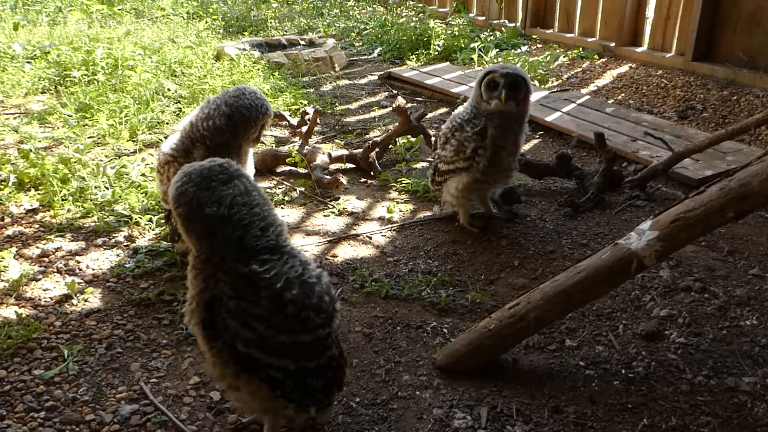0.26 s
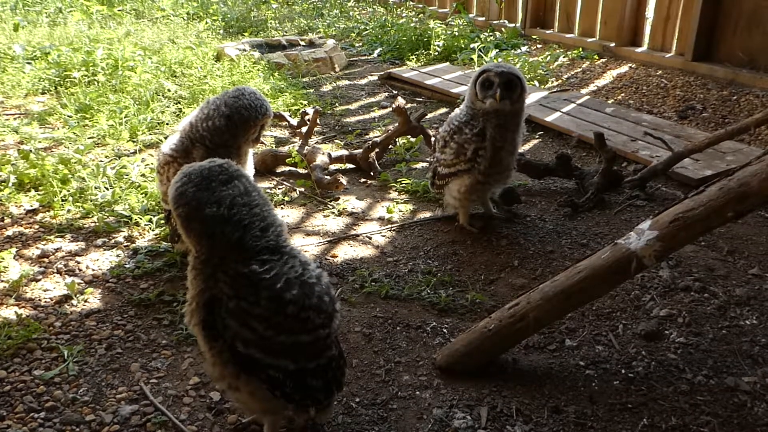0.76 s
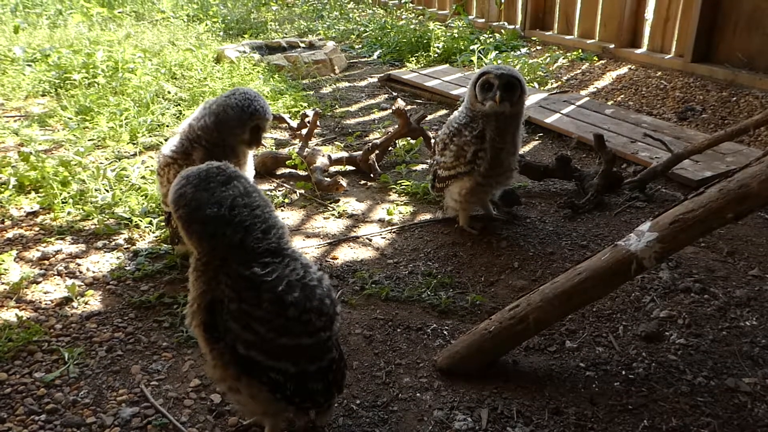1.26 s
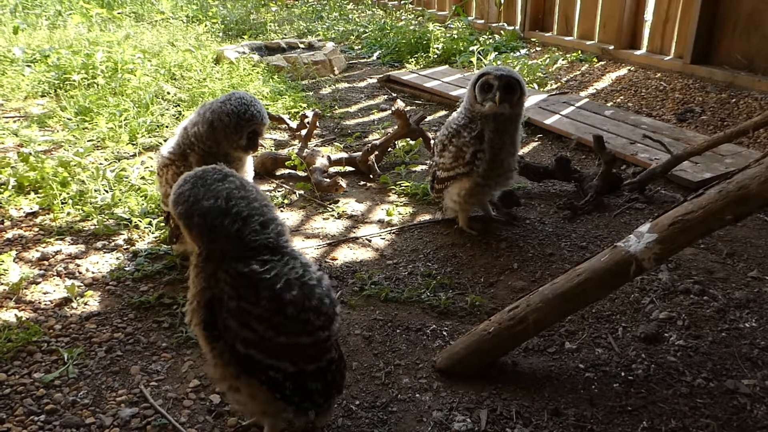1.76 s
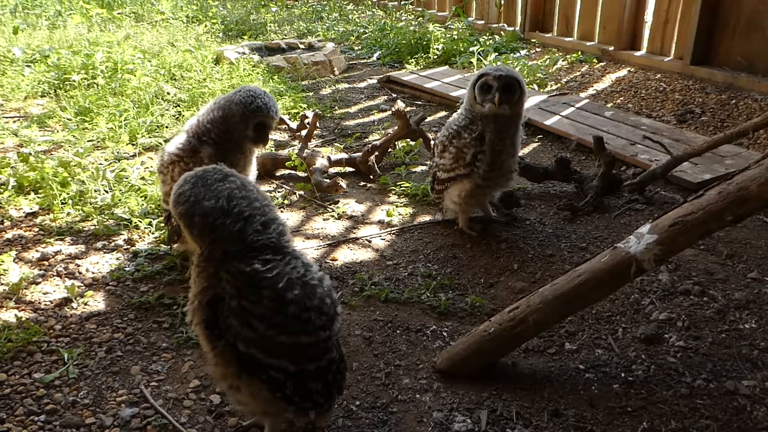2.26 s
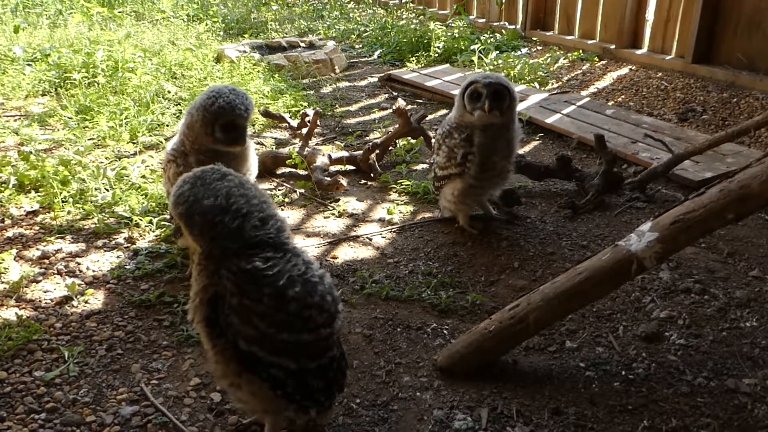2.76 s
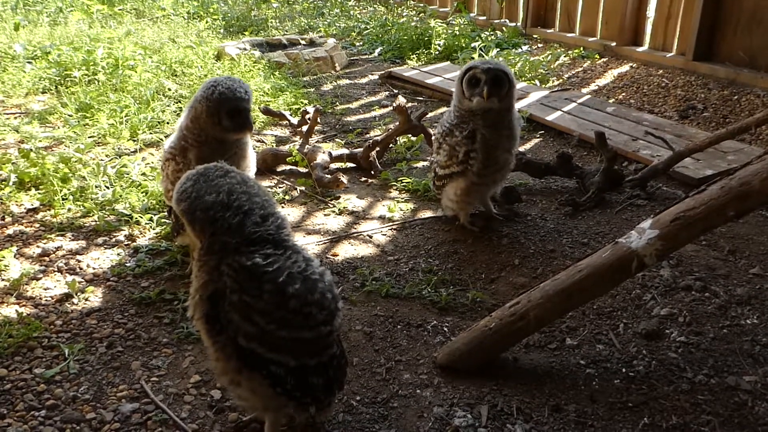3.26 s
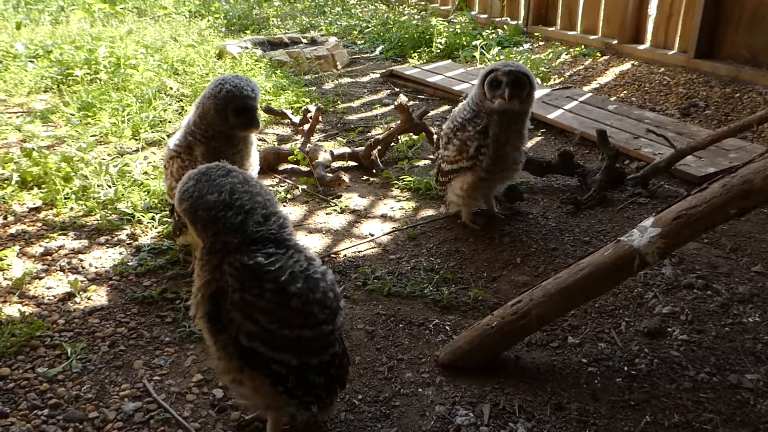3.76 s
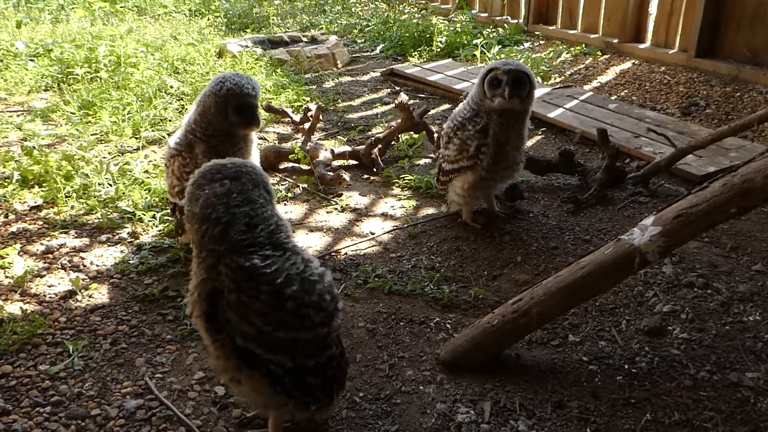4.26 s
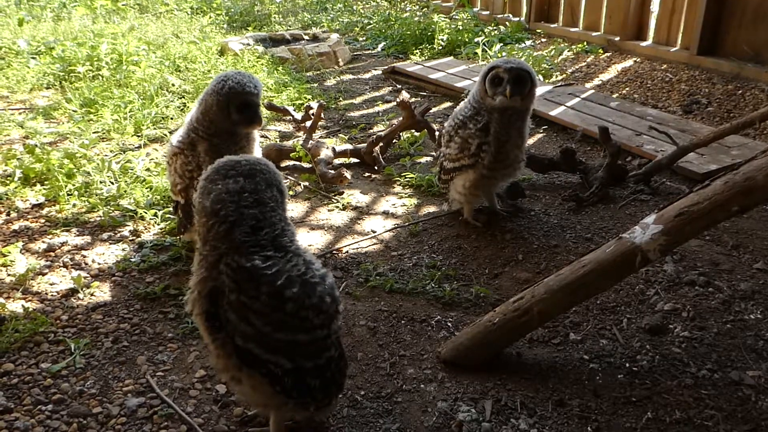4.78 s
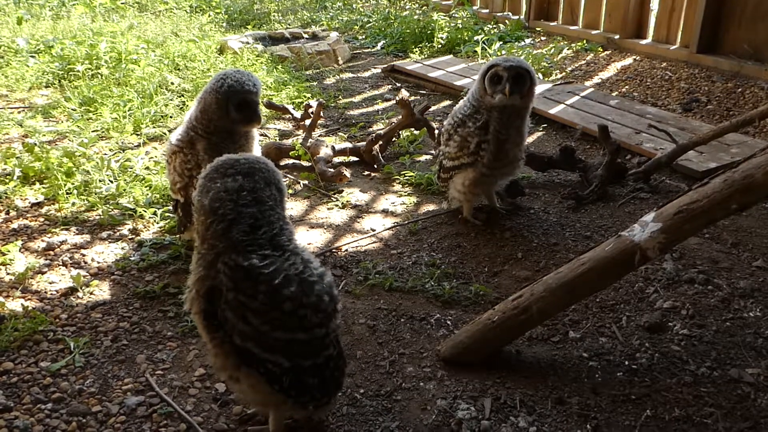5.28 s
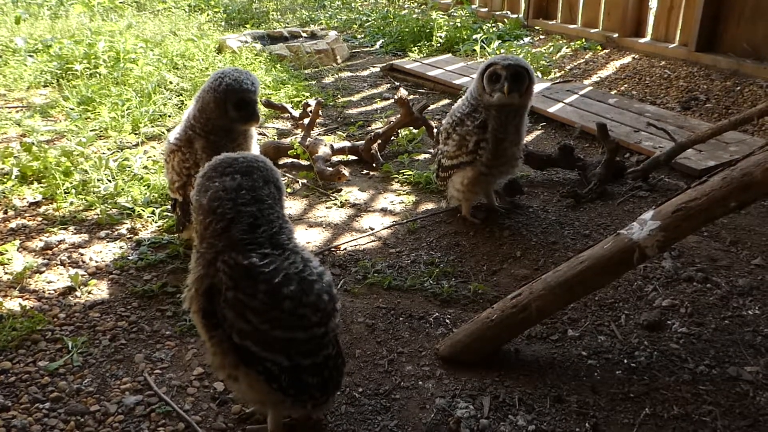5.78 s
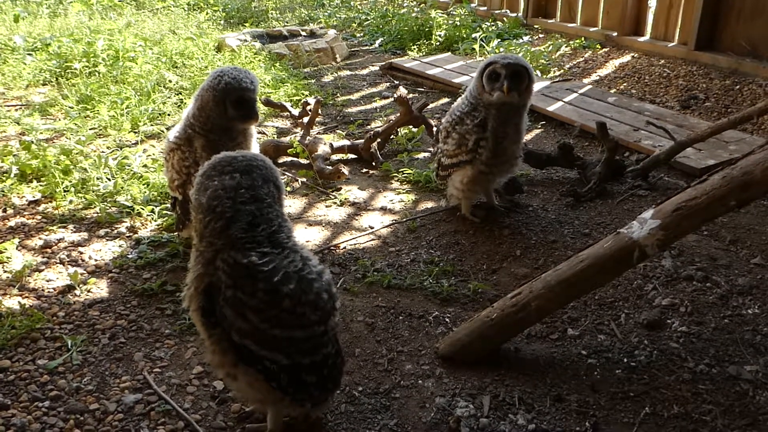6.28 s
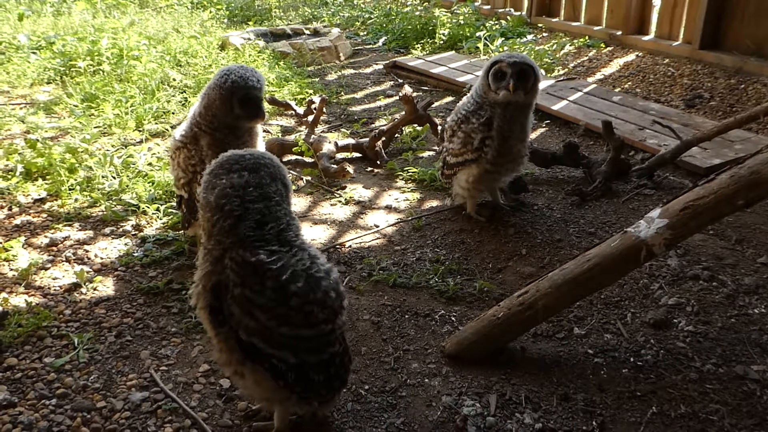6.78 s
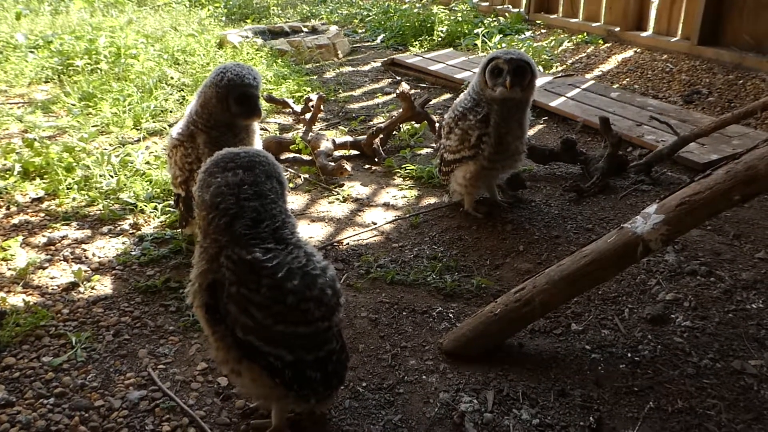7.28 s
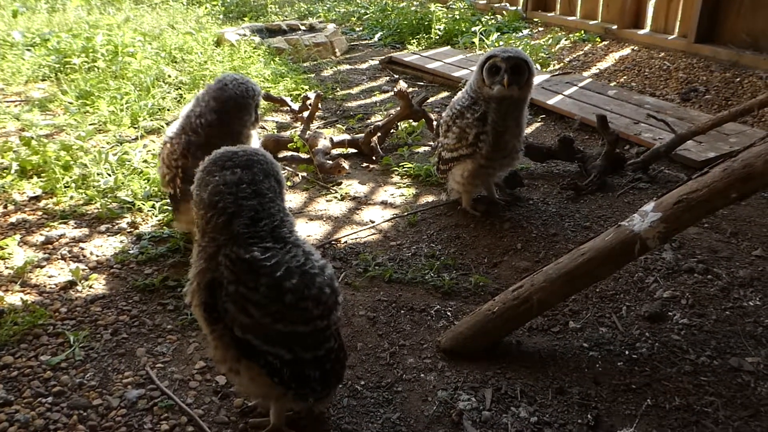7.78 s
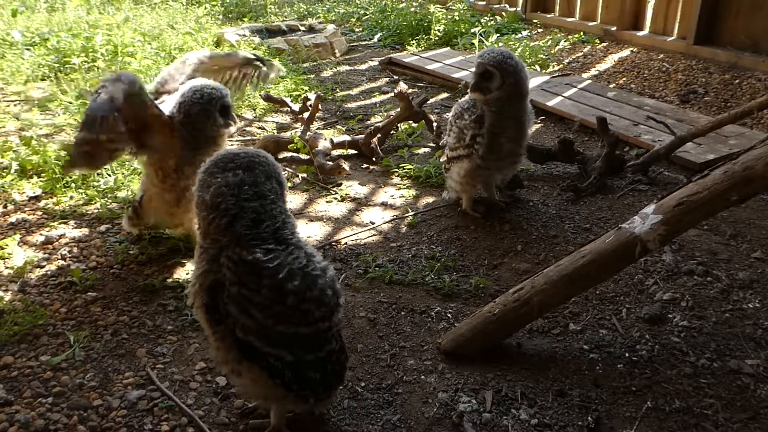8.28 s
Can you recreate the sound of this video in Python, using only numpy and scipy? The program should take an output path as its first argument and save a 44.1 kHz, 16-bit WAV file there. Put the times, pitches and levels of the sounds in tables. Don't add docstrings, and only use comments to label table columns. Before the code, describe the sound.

In an outdoor wooden enclosure, owlets beg with harsh, airy screeches of roughly half a second to a second. An overlapping pair opens, rapid clicks and light snaps fill the pause, then two separate calls follow. The last meets soft feather flapping, a puff of air and a very loud short woody knock. Faint cricket, distant chirps and a soft hum lie beneath, heard from nearby with short plank echoes.

```python
import sys
import numpy as np
from scipy import signal
from scipy.fft import rfft, irfft, next_fast_len
from scipy.io import wavfile

SR = 44100
rng = np.random.default_rng(int(sys.argv[2]) if len(sys.argv) > 2 else 0)


def log_audio(samples):
    frames = np.atleast_2d(samples).T
    limited = np.clip(frames, -1, 1)
    pcm = np.round(limited * 32767).astype(np.int16)
    wavfile.write(sys.argv[1], SR, pcm)


def invert_db(x):
    u = np.asarray(x, float) / 20
    return 10 ** u


N = 376613

# time in seconds, pitch in Hz, level in dB.
WHISTLES = [
    [(0.372, 5300, -51), (0.386, 6000, -34), (0.41, 7800, -49.5), (0.6, 7400, -46), (0.88, 7220, -39),
     (0.925, 6970, -35), (0.965, 6110, -51), (0.995, 5140, -40), (1.04, 4850, -71)],
    [(4.819, 4890, -56), (4.829, 5360, -42), (4.858, 7800, -47.5), (4.93, 6780, -44), (5.191, 6620, -45),
     (5.231, 6730, -40.5), (5.365, 6200, -53.5), (5.392, 5420, -34.5), (5.414, 4790, -39)],
    [(7.539, 5300, -69), (7.547, 5560, -37.5), (7.572, 7740, -36.5), (7.612, 7650, -59), (7.63, 7210, -41),
     (7.804, 7220, -38), (7.87, 6920, -38), (8.06, 5846, -40), (8.125, 5700, -41)],
]
# dB under the tone at 6 kHz, dB lost per kHz of pitch.
OCTAVES = [(-22, 9), (-21, 4.5), (-15, 10.5)]
# width in Hz, steady share.
WHISTLE_BLURS = [(100, 1.0), (170, .45), (95, .8)]
CALL_PAN_DB = [-2, -3.5, 0.3]

# start in seconds, length in seconds, windpipe in Hz at start and at end, pan in dB.
BREATHS = [
    (0.0, 0.78, 958.3, 898, -2.5),
    (.38, 0.69, 853, 830, -3.5),
    (4.815, 0.636, 626, 630, -4),
    (7.542, 0.58, 1022, 1004, 1.7),
]
# windpipe, chest, throat and bill in dB.
VOICES = [(-43, -45.5, -39.5, -49.5), (-56.5, -50, -44.5, -53), (-62, -52, -49, -63),
          (-52, -44.5, -44, -56)]
# windpipe, chest, throat and bill in dB.
SWELLS = [(-8, -1, -2.5, -4.5), (-2.5, 2, -9.5, -6.5), (1.5, 3.5, -7.5, 6), (0.5, 0, 2.5, 2)]
# throat delay in seconds, first spit at the bill in dB,
# windpipe ring width in Hz, attack in seconds.
OPENINGS = [(0.09, 8, 43, .033), (0.058, 6, 27, 0.031), (0.017, 13, 48, 0.038), (0.018, 8.5, 52, 0.033)]
# time in seconds, Hz, share.
GAPES = [
    [(0.0, 3500, .05), (.1, 3700, 0.063), (.74, 3700, 0.11), (.79, 3900, 0.6)],
    [(.38, 5260, .06), (1.08, 5000, .06)],
    [(4.81, 5000, 0.067), (4.9, 5250, 0.24), (5.1, 5190, 0.24), (5.25, 5300, 0.036), (5.48, 5000, 0.036)],
    [(7.535, 4650, .1), (7.7, 4030, 0.12), (7.85, 4096, 0.22), (7.98, 4540, 0.47), (8.03, 4270, 0.32),
     (8.07, 4050, 0.49), (8.17, 4000, 0.92)],
]
# time in seconds, throat, windpipe and bill in dB.
EFFORTS = [
    [(0, -1.5, -2, 0.5), (.23, 0.5, 0, 0), (.3, 2, -2, -1.5), (.42, 1, 0, 1), (.48, 0.5, -3, -1),
     (.6, 1, -1, -1), (.77, 0.5, 1.5, 1), (.8, -6, -3, -1), (.83, -12, -3, -5)],
    [(.38, -0.5, 3, -1), (.8, -1, -2.5, 2), (.87, -2, 8, 0), (.97, -3, 1, 3), (1.0, -1, -4, 1),
     (1.04, -8, -11, -12)],
    [(4.81, 3, 1, -6), (4.88, -3.5, -1.5, 0), (4.95, 3.5, -2, 2), (5.09, 2, 4, -1), (5.13, -0.5, -2, 2),
     (5.25, -3.5, 2.5, -2), (5.36, -3, 2, 2), (5.4, -3, -2, -4), (5.45, 0, -5, -6)],
    [(7.54, -11, -14, 7), (7.6, 0.5, 0, -6), (7.63, 0.5, -1, -5), (7.69, 3, 5, 0.5), (7.75, 1, 2, -1),
     (7.85, -0.5, -4.5, 5), (7.96, 2, -1.5, 0), (8.1, -1, 1.5, -0.5), (8.15, -3, -11, -2)],
]
# time in seconds, length in seconds, gain in dB.
SURGES = [(0.019, 0.014, 4), (0.075, 0.026, 7), (0.149, 0.013, 8.5), (0.228, 0.022, 7), (0.323, 0.018, 3),
          (0.4, 0.042, 9), (0.638, 0.015, 12), (0.715, 0.028, 4.5), (5.077, 0.027, 0), (5.123, .012, 6),
          (5.207, .015, 2), (7.633, 0.022, 10.5), (8.122, 0.016, 0)]
# Hz, width in Hz, level in dB.
CHESTS = [
    [(840, 320, -5.5), (1390, 730, -14), (1904, 400, 1.5), (2530, 720, -7), (2920, 340, -7)],
    [(780, 590, 10), (1250, 1000, -0.5), (2130, 370, 12), (2500, 290, -12), (2600, 750, -3)],
    [(790, 480, 14), (1250, 1300, -0.5), (2020, 540, 16), (2350, 130, 11), (2720, 400, -11)],
    [(740, 770, -6), (1560, 780, -13.5), (2090, 340, 2), (2650, 490, -16), (2950, 250, -3.5)],
]
THROATS = [
    [(3700, 480, 6), (4426, 210, 5), (4850, 680, 5), (5780, 610, -6), (6600, 170, 2)],
    [(3830, 1200, -8.5), (4500, 600, -6), (5300, 290, -0.5), (6220, 440, 3.5)],
    [(3610, 310, -1.5), (4340, 380, -2), (5250, 480, 4.5), (6030, 360, 0)],
    [(3600, 720, 1), (4360, 320, 1.5), (5000, 1000, 0), (6330, 530, -8)],
]
BILLS = [
    [(7400, 2800, 8.5), (8620, 1600, 9.5), (9880, 550, 11), (13000, 1500, 2), (14300, 2200, -9)],
    [(7250, 1300, 13), (8700, 1050, 10), (9800, 2400, 9.5), (12300, 1100, -1), (13900, 900, -4)],
    [(7000, 890, 11), (8550, 1050, 4), (9500, 1200, 8), (12300, 970, -1), (13300, 650, -10)],
    [(7450, 990, 4.5), (9100, 1500, 3), (10900, 1200, -3), (11500, 1100, -23), (14200, 900, -28)],
]

# time in seconds, peak in dB, pan in dB.
SNAPS = [(1.276, -56, -1), (2.720, -58, -1.1), (2.7642, -17, -2), (3.521, -35, -.8), (4.285, -52, -3),
         (4.300, -32, -5), (4.304, -33, -3.5), (6.872, -52, -5), (6.8875, -60, -1), (8.346, -27, 5),
         (8.3597, -0.5, -1.2), (3.31, -55, -6), (5.14, -54.5, -10), (2.7765, -18.5, -1.5),
         (2.7800, -18, -2)]
# Hz, level in dB, t60 in ms, echo in dB.
BODIES = [
    [(2310, 7.5, 1.5, 20), (1120, -5, 6.9, 13), (6000, 1.5, 1.4, 12)],
    [(3000, -2, 3, -3)],
    [(844, -3, 24, -9), (613, -18.5, 24, 4.5), (1140, -16, 18, -0.5), (1720, -13.5, 7.7, -2.5),
     (2190, -7, 2.4, -6), (7800, -2, 0.29, -7.5)],
    [(5640, 4.5, 3.3, 3), (2600, 10.5, 1.5, -1.5), (9500, -1, 2.4, -7.5)],
    [(1570, 0, 13, 15), (2970, -1.5, 29, 0.5)],
    [(1500, 3.5, 7.5, -14), (2950, -5.5, 3.4, -6)],
    [(563, 2.5, 8.3, 3), (430, -17.5, 57, 7), (197, -15.5, 24, 4.5)],
    [(1670, 1.5, 12, -10)],
    [(452, 8, 55, 9.5), (275, 11.5, 93, 1.5)],
    [(1400, -5, 3.1, 12)],
    [(1380, 6, 3.57, -5.5), (980, -19.5, 3.5, 13.5), (2160, 4.5, 2.16, -2), (3400, -17, 1.36, 1.5),
     (4550, -27, 0.88, -1), (8050, -11, 0.92, -20)],
    [(268, 2, 84, -7)],
    [(245, -1.5, 74, 4)],
    [(780, 0, 8.4, -24)],
    [(820, 2.5, 11, -17.5), (1800, -16, 10, -13)],
]
# delay in ms, level in dB.
ECHOES = [(2.8, -6.5), (4.1, -5.5), (9.6, -2), (11.0, -10), (15.0, -38), (17.0, -7)]
# low edge in Hz, high edge in Hz, t60 in seconds, level in dB.
PEN = [(155, 480, 0.37, 0.5), (660, 1220, 0.28, 7.5), (1310, 2240, 0.25, 10.5), (2286, 3460, 0.2, 10.5),
       (5260, 17000, 0.15, 10.5), (9040, 9500, 0.077, 19.5), (3650, 5130, 0.2, 10.5)]

# start in seconds, length in seconds, rustle in dB, push of air in dB.
WINGS = [
    (.45, 0.76, -90, -71.5),
    (2.55, .3, -90, -80),
    (3.4, .3, -90, -80),
    (4.9, 0.4, -90, -76),
    (7.6, 0.68, -90, -77),
    (8.047, 0.46, -58.5, -75),
    (8.332, 0.27, -53.5, -65),
    (8.345, 0.05, -90, -55),
]
# Hz, width in Hz, level in dB.
FEATHERS = [(696, 590, 5), (1630, 1400, 0), (3200, 3700, -3.5)]
# start in seconds, length in seconds, level in dB, pan in dB.
SCUFFS = [
    (1.269, 0.15, -57.5, -4),
    (9.7, 0.034, -55, 0),
    (2.759, 0.013, -40.5, -1),
]
# Hz, width in Hz, level in dB.
GRAVEL = [(900, 640, 5), (2300, 1200, 1), (4200, 2200, -4), (7500, 3300, -15)]

# start in seconds, length in seconds,
# start in Hz, end in Hz, level in dB.
CHIRPS = [(1.3, 0.05, 3500, 3560, -62), (1.35, 0.055, 3560, 3520, -63), (1.435, 0.045, 2990, 2950, -62),
          (1.47, 0.09, 2980, 2970, -62), (5.164, .016, 2900, 3020, -46), (5.418, .03, 4050, 3700, -55),
          (5.42, .028, 5450, 5100, -51), (1.0, .03, 3950, 3650, -59), (5.33, .09, 980, 880, -57),
          (8.072, .05, 11900, 10500, -46), (8.075, .06, 11500, 10600, -50), (8.1, .045, 11000, 10400, -52),
          (5.395, .035, 10400, 9000, -54), (5.425, .02, 8200, 7300, -58), (5.345, .045, 12700, 11700, -61),
          (5.19, .07, 3500, 3450, -62)]
# start in seconds, length in seconds, start in Hz, end in Hz, level in dB.
CRICKET_PHRASES = [
    (3.19, 0.14, 2480, 2500, -67.5),
    (3.72, 0.12, 2680, 2600, -72),
    (5.569, 0.314, 2630, 2530, -72.5),
    (5.75, .07, 2650, 2500, -76),
    (5.802, 0.77, 2523, 2510, -73),
    (6.5, 0.096, 2500, 2530, -70.5),
    (6.85, 0.14, 2550, 2650, -84),
    (7.25, 0.44, 2660, 2600, -100),
]
# start in seconds, length in seconds, level in dB.
BUZZES = [
    (0.0, 1.41, -60),
    (6.662, 0.52, -67),
    (8.287, 0.321, -60.5),
]
# Hz, width in Hz, level in dB, flicker in dB.
INSECTS = [(2232, 38, -80.5, -0.5), (5410, 290, -74, 0.5), (5810, 48, -76, -2.5), (9360, 140, -77, 3.5),
           (9620, 940, -68.5, 0.5)]
# Hz, dB per Hz.
AIR = [(15, -49), (25, -36), (48, -12.5), (280, 1), (537, -0.5), (599, -1), (1210, -6.5), (2520, -7),
       (2970, -9), (4710, -10.5), (5700, -7), (7890, -15), (9540, -17), (15100, -19), (16400, -21)]
WIDE = [(15, -57), (25, -22), (48, -28), (131, -10), (238, -5), (398, -5.5), (456, -6), (1550, -17.5),
        (2520, -23), (4110, -29.5), (9800, -30.5), (14700, -37), (16400, -24)]

AIR_DB, WIDE_DB = -61, -58
BUZZ_HZ, BUZZ_WAVER_DB, BUZZ_FADE_S = 266.3, 0.7, 0.1
CRICKET_HZ, CRICKET_DB, CRICKET_WAVER_DB = 2585, -76.5, 2.5
STAGGER_POWER = 1.28
CHEST_LEAD_S = 0.081
SAG_POWER = 0.7
RELEASE_DB_PER_S, SPIT_S, CLOSED_DB = 516, 0.079, -20.5
STREAK_SHARE, STREAK_HZ = 0.8, 65
THROAT_PATCH_DB, BILL_PATCH_DB, PATCH_HZ = 1.1, 2.5, 7
PUSH_HZ, PUSH_FLOOR_HZ = 120, 60
ECHO_FLOOR_HZ = 1190
TOP_HZ = 15750


def rms_one(x):
    return x / np.sqrt(np.mean(np.abs(x) ** 2) + 1e-20)


def wander(hz, size):
    r = np.exp(-2 * np.pi * hz / SR)
    white = rng.standard_normal((size // SR + 1) * SR + SR // 2)
    smooth = signal.lfilter([1], [1, -2 * r, r * r], white)
    return rms_one(smooth[SR // 2:SR // 2 + size])


def unroll(rows):
    s, *columns = np.transpose(rows)
    at = np.arange(max(round(s[0] * SR), 0), min(round(s[-1] * SR), N))
    since_start = at + SR * (at[0] == 0) - at[0]
    inside = np.minimum(since_start, at[-1] - at)
    fade = np.clip(inside / (0.0089 * SR), 0, 1)
    return at[0], fade, [np.interp(at / SR, s, c) for c in columns]


def unsteady(hz, width_hz, steady):
    tumble = wander(width_hz, size=len(hz)) + 1j * wander(width_hz, size=len(hz))
    return rms_one(steady + tumble) * np.exp(2j * np.pi * np.cumsum(hz) / SR)


def resonate(x, modes):
    out = 0
    for k, (hz, width_hz, db) in enumerate(modes):
        r = np.exp(-np.pi * 1.55 * width_hz / SR)
        b = (1 - r * r) / 2 * np.array([1, 0, -1])
        a = [1, -2 * r * np.cos(2 * np.pi * hz / SR), r * r]
        twice = signal.lfilter(b, a, signal.lfilter(b, a, x))
        out = out + (-1) ** k * invert_db(db) * twice
    return out


def highpass(x, floor_hz):
    return signal.sosfilt(signal.butter(2, floor_hz, "high", fs=SR, output="sos"), x)


def add(out, at, sound, pan_db):
    sound = sound[..., :N - at]
    out[:, at:at + sound.shape[-1]] += sound * invert_db(np.array([[pan_db / 2], [-pan_db / 2]]))


def owlets(echo):
    direct = np.zeros((2, N))
    for k, pan_db in enumerate(CALL_PAN_DB):
        add(direct, *whistle(WHISTLES[k], *OCTAVES[k], WHISTLE_BLURS[k]), pan_db)
    for k, row in enumerate(BREATHS):
        add(direct, *breath(k), row[-1])
    reflected = signal.oaconvolve(highpass(direct, ECHO_FLOOR_HZ), echo, axes=1)[:, :N]
    return invert_db(-5.0) * direct + invert_db(-12.0) * reflected


def breath(k):
    start, length, first_hz, last_hz, _ = BREATHS[k]
    late_s, spit_db, ring_hz, attack_s = OPENINGS[k]
    chest, throat, bill = CHESTS[k], THROATS[k], BILLS[k]
    at, fade, (age,) = unroll([(start, 0), (start + length + .1, length + .1)])
    done, t = np.minimum(age / length, 1), start + age

    attack_db = CLOSED_DB * np.clip(1 - age / attack_s, 0, 1) * (start > 0)
    shape_db = attack_db - RELEASE_DB_PER_S * np.maximum(age - length, 0)
    pipe_db, chest_db, throat_db, bill_db = (shape_db + db + gain_db * done
                                             for db, gain_db in zip(VOICES[k], SWELLS[k]))
    when, throat_more_db, pipe_more_db, bill_more_db = np.transpose(EFFORTS[k])
    pipe_db = pipe_db + sum(db * np.exp(-((t - s) / width_s) ** 2) for s, width_s, db in SURGES)
    pipe_db = pipe_db + np.interp(t, when, pipe_more_db)
    chest_db = chest_db - RELEASE_DB_PER_S / 2 * np.maximum(age - length + CHEST_LEAD_S, 0)
    throat_db = throat_db + np.interp(t, when, throat_more_db)
    bill_db = bill_db + np.interp(t, when, bill_more_db) + spit_db * np.exp(-(age / SPIT_S) ** 2)
    opens = []
    for hz, _, _ in throat:
        delay_s = late_s * (hz / throat[0][0]) ** STAGGER_POWER
        opens.append(invert_db(CLOSED_DB * np.clip(1 - age / delay_s, 0, 1)))

    gusts = invert_db(1.3 * wander(163, size=len(fade)))
    air = rng.standard_normal((3, 2 * SR))[:, :len(fade)] * gusts
    folds_hz = np.geomspace(1300, 6500, 16) * rng.uniform(.96, 1.04, 16)
    air = air + STREAK_SHARE * resonate(air, [(hz, STREAK_HZ, 0) for hz in folds_hz])

    pipe_hz = first_hz + (last_hz - first_hz) * done ** SAG_POWER
    pipe = unsteady(pipe_hz, width_hz=ring_hz, steady=0.55).real
    pipe = pipe + 0.39 * unsteady(pipe_hz, width_hz=164, steady=0).real
    s, gape_hz, share = np.transpose(GAPES[k])
    gape = np.interp(t, s, share) * unsteady(np.interp(t, s, gape_hz), width_hz=120, steady=0).real

    low = rms_one(pipe) * invert_db(pipe_db + 2.86) + rms_one(resonate(air[0], chest)) * invert_db(chest_db)
    hiss = patchy(air[1], throat, opens, THROAT_PATCH_DB)
    middle = rms_one(opens[0] * gape + hiss) * invert_db(throat_db + 3.0)
    high = rms_one(patchy(air[2], bill, np.ones(len(bill)), BILL_PATCH_DB)) * invert_db(bill_db + 3.0)
    return at, fade * (low + middle + high)


def patchy(x, modes, opens, depth_db):
    out = 0
    for k, mode in enumerate(modes):
        swell = invert_db(depth_db * wander(PATCH_HZ, size=len(x)))
        out = out + (-1) ** k * opens[k] * swell * resonate(x, [mode])
    return out


def whistle(rows, octave_db, tilt_db, blur):
    at, fade, (hz, db) = unroll(rows)
    tone = unsteady(hz * (1 + 0.0046 * wander(102, size=len(hz))), *blur)
    partner = unsteady(hz, width_hz=180, steady=0.2) + 0.62 * unsteady(hz, width_hz=720, steady=0)
    octave = tone * partner * invert_db(octave_db - tilt_db * (hz / 1000 - 6.0))
    return at, fade * invert_db(db + 4.5) * (tone + octave).real


def snaps(echo):
    out, t = np.zeros((2, N)), np.arange(SR // 10) / SR
    for (s, peak_db, pan_db), body in zip(SNAPS, BODIES):
        for hz, part_db, t60_ms, echo_db in body:
            decay = invert_db(np.maximum(peak_db + part_db - 60000 * t / t60_ms, -200))
            ring = -decay * np.sin(2 * np.pi * hz * t) * (1 - np.exp(-2.5 * hz * t))
            pole = np.exp(-2.6 * hz / SR)
            ring = signal.lfilter([1, -2, 1], [1, -2 * pole, pole * pole], ring)
            add(out, round(s * SR), ring, pan_db)
            add(out, round(s * SR), invert_db(echo_db) * signal.fftconvolve(ring[None], echo, axes=1), pan_db)
    return out


def pen_echo():
    t = np.arange(SR // 2) / SR
    shared, apart = rng.standard_normal((2, len(t)))
    noise = shared + .55 * apart * np.array([[1], [-1]])
    echo = np.zeros((2, len(t)))
    for low_hz, high_hz, t60_s, db in PEN:
        band = signal.sosfilt(signal.butter(2, [low_hz, high_hz], "band", fs=SR, output="sos"), noise)
        echo += band * invert_db(db - 27 - 60 * t / t60_s) * np.clip((t - .009) / 0.00091, 0, 1)
    for ms, db in ECHOES:
        echo[:, round(ms * SR / 1000)] += invert_db(db - 4.5)
    return echo


def wings():
    out = np.zeros((2, N))
    for s, length, rustle_db, push_db in WINGS:
        size = round(length * SR)
        rustle = rms_one(resonate(rng.standard_normal((2, size)), FEATHERS))
        rustle = rustle * invert_db(rustle_db + 2.5 * wander(30, size=size))
        push = invert_db(push_db) * np.array([wander(PUSH_HZ, size=size), wander(PUSH_HZ, size=size)])
        add(out, round(s * SR), np.hanning(size) * (rustle + highpass(push, PUSH_FLOOR_HZ)), .6)
    return out


def scuffs():
    out = np.zeros((2, N))
    for s, length, db, pan_db in SCUFFS:
        t = np.arange(round(length * SR)) / SR
        shape = np.clip(t / 0.0055, 0, 1) * (1 - t / length)
        rush = rms_one(resonate(rng.standard_normal(len(t)), GRAVEL)) * invert_db(db + 1.3 * wander(80, size=len(t)))
        add(out, round(s * SR), shape * rush, pan_db)
    return out


def glides(rows, gain_db, width_hz, steady):
    out = np.zeros((2, N))
    for s, length, start_hz, end_hz, db in rows:
        hz = np.linspace(start_hz, end_hz, round(length * SR))
        tone = unsteady(hz, width_hz, steady).real
        add(out, round(s * SR), invert_db(db + gain_db) * np.hanning(len(hz)) ** .5 * tone, -.5)
    return out


def songbirds():
    return glides(CHIRPS, gain_db=0, width_hz=100, steady=1.2)


def cricket():
    out = glides(CRICKET_PHRASES, gain_db=5.0, width_hz=37, steady=0.98)
    trill = unsteady(np.full(N, CRICKET_HZ), width_hz=45, steady=0.3).real
    add(out, 0, invert_db(CRICKET_DB + CRICKET_WAVER_DB * wander(6.0, size=N)) * trill, -.5)
    return out


def buzz():
    out = np.zeros((2, N))
    for s, length, db in BUZZES:
        t = np.arange(round(length * SR)) / SR
        fade = np.clip(np.minimum(t + (s == 0), length - t) / BUZZ_FADE_S, 0, 1)
        drone = unsteady(np.full(len(t), BUZZ_HZ), width_hz=16, steady=2.6).real
        level = invert_db(db + 0.5 + BUZZ_WAVER_DB * wander(23, size=len(t)))
        add(out, round(s * SR), fade * level * drone, -1.2)
    return out


def background():
    middle = invert_db(AIR_DB - 3.5 + .5 * wander(3, size=N)) * coloured(AIR)
    for hz, width_hz, db, flicker_db in INSECTS:
        band = rms_one(resonate(rng.standard_normal(N), [(hz, width_hz, 0)]))
        middle = middle + invert_db(db + flicker_db * wander(12.0, size=N)) * band
    side = invert_db(WIDE_DB) * coloured(WIDE)
    return np.array([middle + side, middle - side]) * invert_db(np.array([[-.3], [.3]]))


def coloured(spectrum):
    hz, db = np.transpose(spectrum)
    size = next_fast_len(N)
    grid_hz = np.maximum(np.fft.rfftfreq(size, 1 / SR), 1)
    gain = invert_db(np.interp(np.log(grid_hz), np.log(hz), db))
    return rms_one(irfft(rfft(rng.standard_normal(size)) * gain, size)[:N])


def scene():
    echo = pen_echo()
    birds = owlets(echo) + snaps(echo) + wings() + scuffs()
    return birds + songbirds() + cricket() + buzz() + background()


def top_cut(x):
    return signal.sosfilt(signal.butter(12, 16570, fs=SR, output="sos"), x)


def record(dry):
    mix = signal.sosfilt(signal.ellip(10, .5, 70, TOP_HZ, fs=SR, output="sos"), dry)
    return top_cut(mix)


dry = scene()
out = record(dry)
log_audio(out)
```